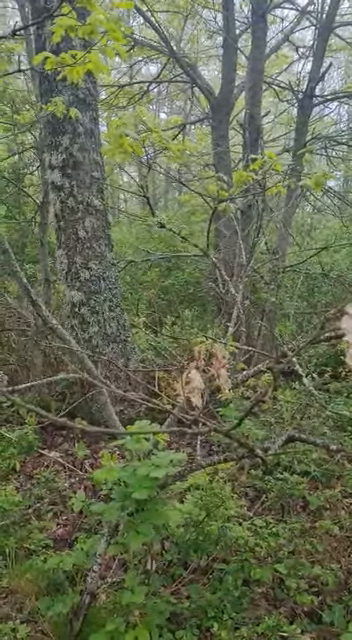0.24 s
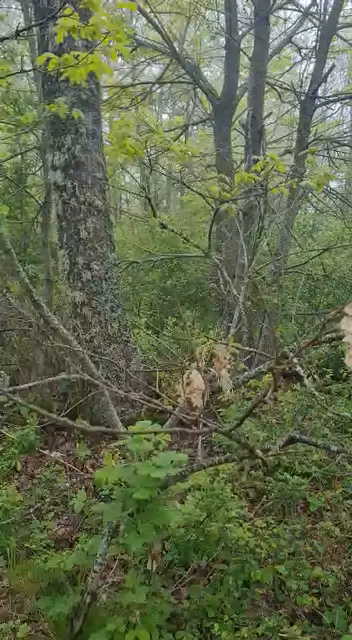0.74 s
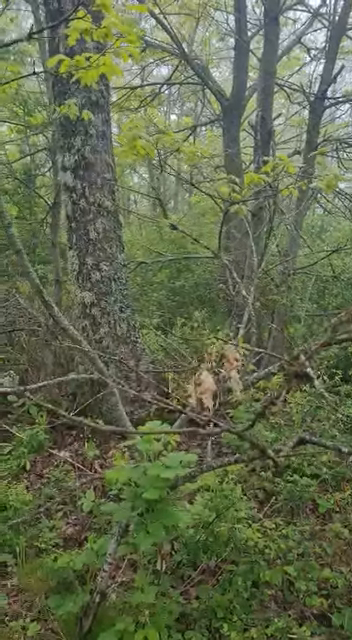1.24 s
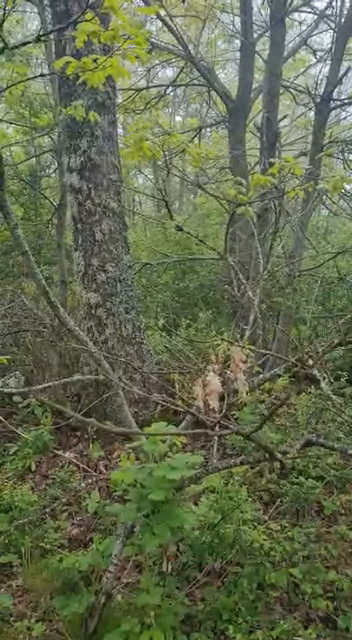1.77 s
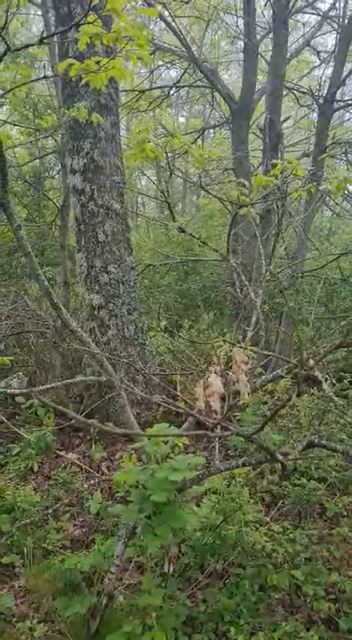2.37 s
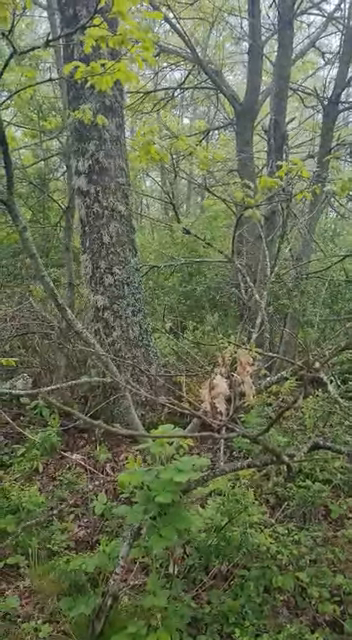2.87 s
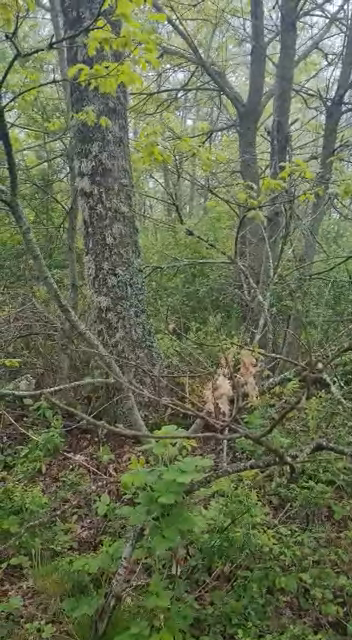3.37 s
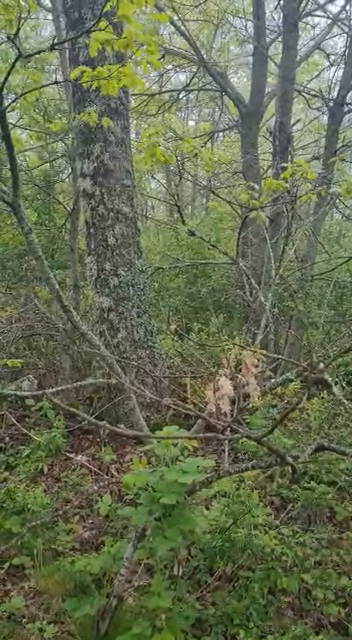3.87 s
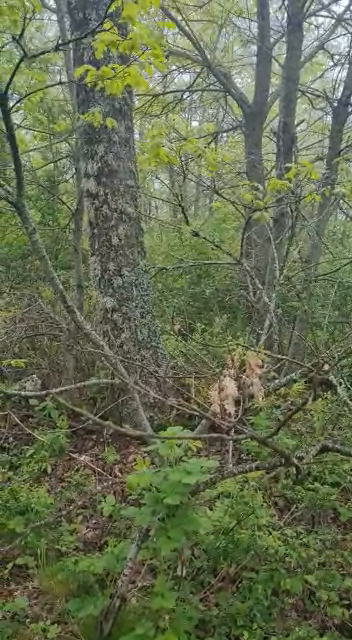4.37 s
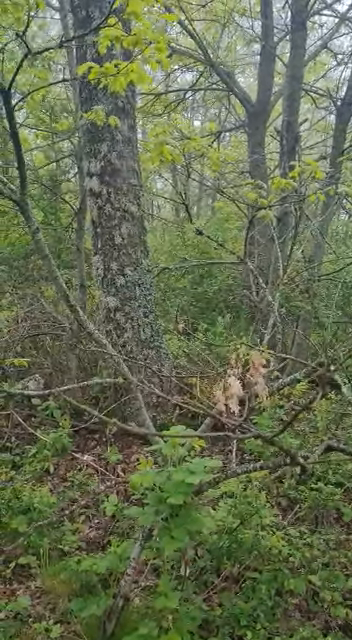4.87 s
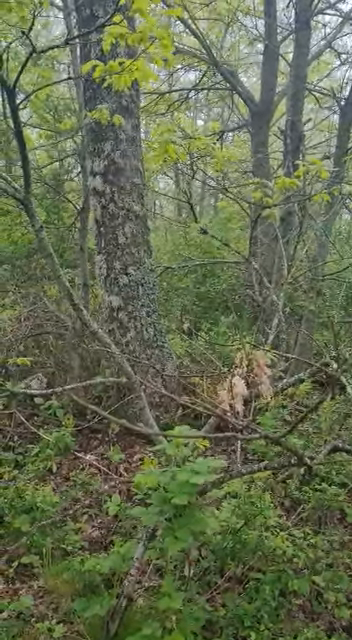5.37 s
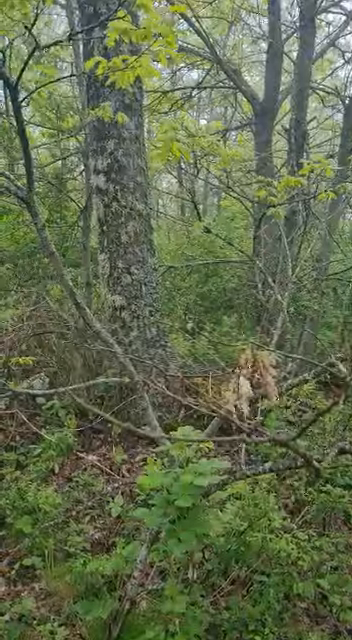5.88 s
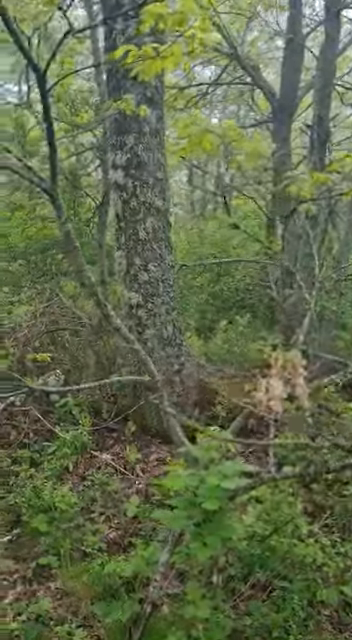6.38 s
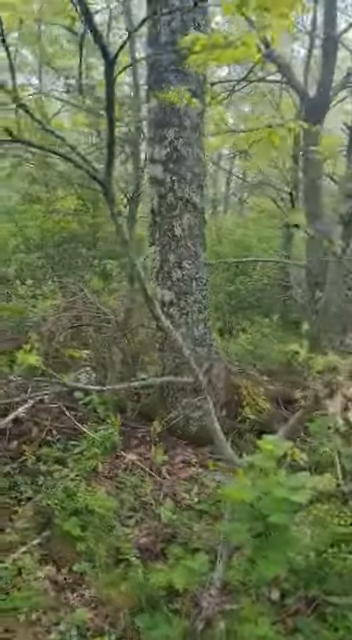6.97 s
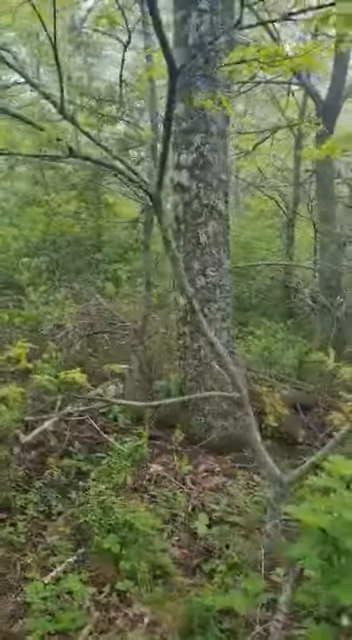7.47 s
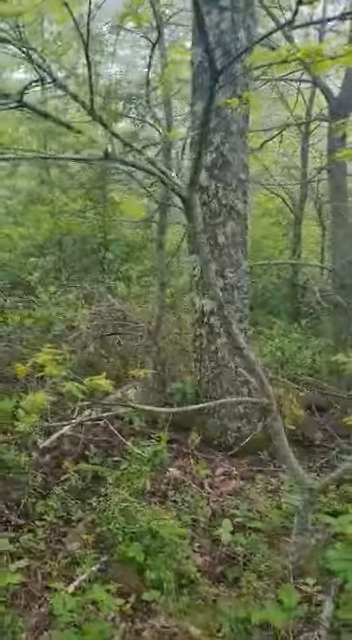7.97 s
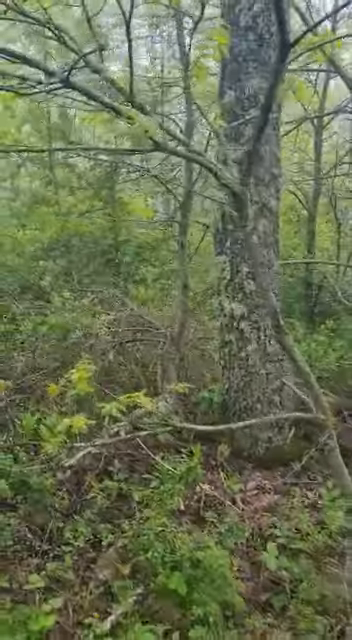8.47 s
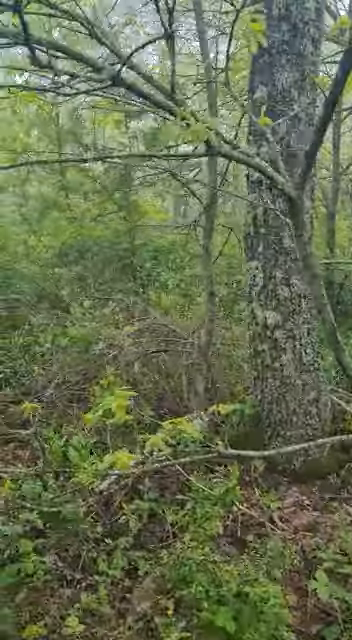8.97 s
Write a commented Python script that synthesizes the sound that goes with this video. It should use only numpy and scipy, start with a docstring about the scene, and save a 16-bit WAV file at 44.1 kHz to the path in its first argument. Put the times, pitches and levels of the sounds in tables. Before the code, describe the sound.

Distant dog barks echo among trees, with a small nearer bell jingling, birds chipping and trilling, and heavy low wind buffeting late on.

```python
"""A hound barks in two runs some way off in a damp wood: a fold tone and a hoarse rasp through its throat,
followed by a diffuse tail of noise scattered from the trunks. A small collar bell jingles nearer by as
scraped ringing modes. Songbirds chip, trill and whistle in gliding sines, with one short buzz.
Gusts of wind thump on the microphone ports as lumpy low noise, over a growing high hiss and still air."""
import sys
import numpy as np
from scipy import signal
from scipy.fft import rfft, irfft, next_fast_len
from scipy.io import wavfile
from scipy.ndimage import uniform_filter1d

SR = 44100
rng = np.random.default_rng(int(sys.argv[2]) if len(sys.argv) > 2 else 0)


def log_audio(samples):
    """Write samples as a 16-bit WAV file to the path given in sys.argv[1]."""
    # one column per channel
    frames = np.atleast_2d(samples).T
    # limit to full scale, then quantise
    limited = np.clip(frames, -1, 1)
    pcm = np.round(limited * 32767).astype(np.int16)
    wavfile.write(sys.argv[1], SR, pcm)


def ratio(d):
    """dB to gain"""
    e = np.asarray(d, float) / 20
    return 10 ** e


N = 407474
TIME = np.arange(N) / SR


def rms_one(x):
    """Scale to unit rms."""
    return x / np.sqrt(np.mean(x ** 2) + 1e-20)


def in_time(rows, t=TIME):
    """Columns of a curve, joined by straight lines."""
    s, *columns = np.transpose(rows)
    return [np.interp(t, s, column) for column in columns]


def at_hz(points, hz):
    """A table read on a log-frequency axis."""
    table_hz, values = np.array(points).T
    return np.interp(np.log(hz + 1), np.log(table_hz), values)


def filtered(x, order, edges_hz, kind):
    """Butterworth filter."""
    return signal.sosfilt(signal.butter(order, edges_hz, kind, fs=SR, output="sos"), x)


def coloured(spectrum):
    """Two unrelated noises with the given spectrum, at unit rms."""
    size = next_fast_len(N)
    white = rfft(rng.standard_normal((2, size)))
    gain = ratio(at_hz(spectrum, np.fft.rfftfreq(size, 1 / SR)))
    return rms_one(irfft(white * gain, size)[:, :N])


def drift(rate_hz):
    """Slow chance for two channels, spread 1."""
    r = np.exp(-2 * np.pi * rate_hz / SR)
    slow = signal.lfilter([1], [1, -2 * r, r * r], rng.standard_normal((2, N + SR)))
    return rms_one(slow[:, SR:])


def resonance(x, hz, width_hz):
    """Two-pole band-pass, gain 1 on top."""
    r = np.exp(-np.pi * width_hz / SR)
    feedback = [1, -2 * r * np.cos(2 * np.pi * hz / SR), r * r]
    return signal.lfilter((1 - r * r) / 2 * np.array([1, 0, -1]), feedback, x)


def fades(t, start, end, fade_s):
    """Soft edges for a note; the closing fade begins at its end."""
    return np.clip((t - start) / fade_s, 0, 1) * np.clip((end - t) / fade_s + 1, 0, 1)


def panned(x, left_db):
    """Place a sound by its left-right level difference."""
    return x * ratio(np.array([[.5], [-.5]]) * left_db)


OCTAVE_DB, OCTAVE_DB_PER_SAG = -10, 25      # the octave is stronger while the pitch climbs
BELOW_DB, ABOVE_DB = -19, -14      # lines that the pattern adds below and above the tone


def fold_tone(cycles, group, sag, climbing, luck):
    """The clear tone of the vocal folds, with lines in between where strong and weak cycles alternate."""
    slow = 2 * np.pi * cycles / group
    octave = ratio(OCTAVE_DB + OCTAVE_DB_PER_SAG * sag * climbing) * np.sin(2 * group * slow)
    tone = np.sin(group * slow) + ratio(ABOVE_DB) * np.sin((group + 1) * slow) + octave
    unsteady = ratio(4 * np.interp(cycles / 6, np.arange(128), luck))      # the pattern comes and goes
    below = sum(ratio(BELOW_DB - 8.4 * k) * np.sin((group - 1 - k) * slow) for k in range(group - 1))
    return tone + unsteady * below


JITTER, RASP = 0.045, 0.89      # pulse timing spread [cycles], noise against unit-rms pulses
# throat resonances: (centre [Hz], width [Hz], level [dB])
THROAT = [(553.6, 77, 9), (952, 148, 11), (1397, 86, 6), (1620, 334, -2.5), (2495, 250, -7),
          (3900, 700, -38.5)]


def hoarse_throat(cycles, group, rasp, throat_share, luck):
    """Uneven pulses from the folds and rasping noise ring the resonances of the throat."""
    uneven = cycles + JITTER * np.interp(cycles, np.arange(128), luck[0])
    strength = ratio(3.5 * luck[1][uneven.astype(int) % 128])
    pulses = np.diff(np.floor(uneven), prepend=0).clip(0) * strength
    pattern = 1 + 0.24 * np.cos(2 * np.pi * cycles / group)
    source = (rms_one(pulses) + RASP * rasp) * pattern
    throat = 0
    for k, (centre_hz, width_hz, db) in enumerate(THROAT):
        throat = throat + ratio(db) * resonance(source, centre_hz * throat_share, width_hz) * (-1) ** k
    return rms_one(filtered(throat, 4, [480, 3000], "band"))


BREATH_DB = -15
AIR_AWAY_DB, AIR_FACING_DB = -26.5, -8.5      # highest hiss against the lower hiss
TURN_S = 5      # from here on the muzzle points this way


def breath(rasp, start):
    """The rasp heard as hiss above the throat, brightest when the muzzle points this way."""
    air_db = AIR_FACING_DB if start > TURN_S else AIR_AWAY_DB
    low_hiss = filtered(rasp, 2, [3000, 7600], "band")
    high_hiss = filtered(rasp, 2, [8000, 15400], "band")
    return ratio(BREATH_DB) * (low_hiss + ratio(air_db) * high_hiss)


CREST_SHARE = .52      # place of the top of the pitch arch in the bark
START_SAG, END_SAG = .42, .44      # share of the top pitch missing at either end
FALL_POWER = 1.5      # the pitch leaves the top more steadily than it came
WOBBLE = .035      # unsteady pitch of the folds, as a share
TONE_DB_PER_SAG = 54.5      # the clear tone fades as the pitch leaves the top
HOARSE_ATTACK_S, HOARSE_START_DB, HOARSE_OPEN_DB, HOARSE_END_DB = 0.047, -34, -0.5, -17.5
HIGH_BARK_HZ = 585      # lower barks repeat a strong-weak pattern every three cycles, higher ones every four


def bark(start, length, top_hz, tone_db, hoarse_db, throat_share):
    """A clear fold tone on an arch of pitch; its uneven pulses and rasp ring the throat."""
    end, crest = start + length, start + CREST_SHARE * length
    t = np.arange(start, end + 0.0067, 1 / SR)
    climbing = t < crest
    rise_sag = START_SAG * ((crest - t) / (crest - start)) ** 2
    fall_sag = END_SAG * (abs(t - crest) / (end - crest)) ** FALL_POWER
    sag = np.where(climbing, rise_sag, fall_sag)
    tone_db = tone_db - TONE_DB_PER_SAG * sag
    hoarse_db = hoarse_db + np.interp(t, [start, start + HOARSE_ATTACK_S, crest, end],
                                      [HOARSE_START_DB, HOARSE_OPEN_DB, 0, HOARSE_END_DB])
    luck = rng.standard_normal((2, 128))
    wobble = np.interp(t, np.linspace(start, end, 9), rng.standard_normal(9))
    cycles = np.cumsum(top_hz * (1 - sag) * (1 + WOBBLE * wobble)) / SR
    group = 4 if top_hz > HIGH_BARK_HZ else 3
    rasp = rng.standard_normal(len(t))
    tone = fold_tone(cycles, group, sag, climbing, luck[1])
    hoarse = hoarse_throat(cycles, group, rasp, throat_share, luck) + breath(rasp, start)
    voice = np.sqrt(2) * ratio(tone_db) * tone + ratio(hoarse_db) * hoarse
    return round(start * SR), voice * fades(t, start, end, 0.024)


# barks: (start [s], length [s], top pitch before wobble [Hz], clear tone at the crest [dB],
#         hoarse part at the crest [dB], throat pitch [share of normal])
BARKS = [(0.779, 0.17, 537.8, -49.5, -36.5, 1.066), (1.237, 0.17, 504.5, -49.5, -38, 1.015),
         (1.789, 0.18, 512.4, -48.5, -39.5, 1.04), (2.275, 0.19, 567, -46, -37, 1.044),
         (2.758, 0.18, 511.5, -47, -38, 1.057), (6.418, 0.17, 595.6, -38, -34, 1.085),
         (6.816, .185, 679, -33, -35, 1.08), (7.194, .165, 625.7, -34, -37.5, 1.002),
         (7.66, .17, 561, -42, -39.5, 1.057), (8.101, 0.19, 574.2, -47, -39, 1.27),
         (8.805, 0.17, 553.4, -46.5, -39.5, 1.074)]


def hound():
    """Two runs of barks from one dog, each bark added at its start."""
    out = np.zeros(N)
    for row in BARKS:
        at, sound = bark(*row)
        out[at:at + len(sound)] += sound
    return out


# decay of the wood's tail: (frequency [Hz], time to fall 60 dB [s])
WOOD_T60_S = [(300, 0.7), (1000, 0.84), (2500, 0.72), (6000, 0.33), (14000, 1)]


def wood(x, onset_s):
    """Scatter from many trunks: noise that swells briefly and dies band by band, partly shared by both ears."""
    t, tail = np.arange(SR) / SR, 0
    edges = 150 * 2 ** np.arange(0, 7.1, .5)
    for low, high in zip(edges, edges[1:]):
        band = filtered(rng.standard_normal((2, SR)), 2, [low, high], "band")
        tail = tail + band * ratio(-60 * t / at_hz(WOOD_T60_S, np.sqrt(low * high)))
    tail = tail * (1 - np.exp(-t / onset_s)) / np.sqrt(SR / 20)
    tail = tail + 0.79 * tail.mean(axis=0)      # part of the scatter comes from straight ahead
    return signal.fftconvolve(x[None], tail)[:, :N]


BELL_LEFT_DB, BELL_SWING_DB = -3, 1.5      # where the bell hangs, and how far each stroke strays from there
# faint chance touches between the strokes
TOUCH_FROM_S, TOUCH_DB, TOUCH_SPREAD_DB, TOUCH_LOW_DB = 3., -72., 2, -8.5
# the clearest bell strokes: (time [s], relative level [dB], relative weight of the low modes [dB])
JINGLE = [(0.0794, -81.5, 8), (0.265, -65, -0.5), (0.3037, -64, -4), (0.4334, -67, -0.5),
          (1.0859, -63.5, -15), (2.0712, -71, -5.5), (2.561, -55, -7.5), (3.0946, -57.5, -5.5),
          (3.3406, -66, 0), (3.4199, -75, 2), (3.504, -72.5, 6), (3.6199, -69.5, -4),
          (3.8833, -60.5, -13.5), (3.991, -58, -11.5), (4.1061, -57, -34.5), (4.184, -60.5, -6),
          (4.484, -57, -5), (4.5326, -58, -11.5), (4.6852, -56.5, -1.5), (4.795, -55, 2),
          (5.0095, -56.5, -1), (5.0524, -61, -27), (5.1816, -48.5, -31.5), (5.455, -60, -27.5),
          (5.5203, -56.5, -24), (5.7314, -60, -6.5), (5.8047, -47, -24.5), (6.0107, -49.5, -2.5),
          (6.1145, -45, -11), (6.4378, -52, -5), (6.4697, -41, -14), (6.667, -57.5, -11), (6.81, -46, -8),
          (6.8389, -52.5, -9.5), (7.0219, -58.5, -1.5), (7.234, -58, -17), (7.3707, -59.5, 3.5),
          (7.703, -51, -17), (7.8416, -67, 4), (8.254, -57.5, -19), (8.4722, -57, 1), (8.6524, -58.5, -6),
          (8.774, -59, -29.5), (9.0215, -62.5, 3.5), (9.0658, -69, -3)]


def strokes(count=26):
    """Clear clapper strokes and faint chance touches: time, level, low-mode weight, left-right difference."""
    when, size = rng.random(count), rng.standard_normal(count)
    touch_s = TOUCH_FROM_S + when * (N / SR - TOUCH_FROM_S)
    touches = [touch_s, TOUCH_DB + TOUCH_SPREAD_DB * size, np.full(count, TOUCH_LOW_DB)]
    s, level_db, low_db = np.hstack([np.transpose(JINGLE), touches])
    return s, level_db, low_db, BELL_LEFT_DB + BELL_SWING_DB * rng.standard_normal(len(s))


# bell modes: (frequency [Hz], relative level [dB], time to fall 60 dB [s])
BELL = [(2124, -14, .12), (2229, 0, .18), (4701, -11, .2), (5349, -10, .18), (6562, -19, .15),
        (7284, -16, .15), (8748, -10, .16), (9302, -13, .15), (11177, -12, .14), (11256, -12, .14),
        (12300, -20, .12), (13600, -13, .1), (13947, -10, .1), (14038, -7, .11), (14088, -6, .12),
        (14202, -6, .11), (14330, -8, .1), (15500, -14, .1)]


def bell():
    """Each stroke scrapes every mode with a strength of its own, then rattles lightly as the modes ring down."""
    s, level_db, low_db, left_db = strokes()
    at, out = (s * SR).astype(int), np.zeros((2, N))
    luck = rng.standard_normal((len(at), len(BELL)))
    scrape, rattle, swell = (np.exp(-1 / (decay_s * SR)) for decay_s in (0.014, .07, .0025))
    for k, (hz, db, t60) in enumerate(BELL):
        low_lift_db = np.minimum(low_db + 6.5, 14) * (hz < 3000)
        blow_db = level_db - 31.5 + db + 2.5 * luck[:, k] + low_lift_db
        blows = np.zeros((2, N))
        blows[:, at] = panned(ratio(blow_db), left_db)
        scraping = signal.lfilter([1], [1, -scrape], blows + 1e-18)
        rattling = ratio(-11.5) * signal.lfilter([1], [1, -rattle], blows + 1e-18)
        # the contact builds up softly
        force = signal.lfilter([1 - swell], [1, -swell], scraping + rattling)
        force = force * (rng.standard_normal(N) + 1.265 * rng.standard_normal((2, N)))
        force[0] = np.roll(force[0], rng.integers(0, 8))      # each mode has its own delay at the left port
        r, w = ratio(-60 / (t60 * SR)), 2 * np.pi * hz / SR
        out += signal.lfilter([0, np.sin(w)], [1, -2 * r * np.cos(w), r * r], force + 1e-18)
    return filtered(out, 4, 1950, "high")      # too small to radiate lower


def sing(out, start, hz, gain):
    """A near sine added at its place."""
    at = round(start * SR)
    note = gain * np.sin(2 * np.pi * np.cumsum(hz) / SR)
    return out + np.pad(note, (at, N))[:N]


CHIP_TOP_HZ, DOUBLE_TOP_HZ, DOUBLE_END_HZ = 7000, 4400, 2793
SECOND_S, SECOND_DB = .02, -4      # the second chip of a pair: how much later, how much weaker
# falling chips: (time, 8 ms after onset [s], relative level [dB], pitch it settles on [Hz])
CHIPS = [(0.517, -65.5, 3900), (1.55, -69.5, 3800), (1.904, -59.5, 4680), (2.269, -65.5, 4900),
         (2.631, -67, 3970), (2.984, -70, 3760), (3.373, -62, 4650), (3.752, -68, 3585), (4.114, -65, 3466),
         (4.478, -59, 4160), (7.216, -60, 3450), (8.583, -70, 3860), (8.688, -80, 4770),
         (8.943, -62.5, 3920)]
# double chips of a lower bird: (time of the first, 8 ms after onset [s], relative level [dB])
DOUBLES = [(5.25, -63), (5.342, -60.5), (5.442, -60.5), (5.548, -60)]


def chips():
    """A fast fall from high up that levels out on a short whistle."""
    out, t = np.zeros(N), np.arange(0, .075, 1 / SR)
    notes = [(s, db, CHIP_TOP_HZ, end_hz) for s, db, end_hz in CHIPS]
    for s, db in DOUBLES:
        notes += [(s + k * SECOND_S, db + k * SECOND_DB, DOUBLE_TOP_HZ, DOUBLE_END_HZ) for k in (0, 1)]
    for s, level_db, top_hz, end_hz in notes:
        fall_hz = top_hz - end_hz
        hz = end_hz + fall_hz * np.exp(-t / 0.01)
        shape = fades(t, 0, fall_hz / 75000, 0.0016)      # a deeper fall lasts longer
        out = sing(out, s - .008, hz, ratio(level_db - 2.0) * shape)
    return out


FIRST_GAP_S, SLOWING = .042, 1.052      # each gap is longer than the one before by this factor
# slowing trills: (start [s], notes [count], relative level of the first note [dB], of the last [dB])
TRILL = [(0.405, 16, -67, -61.5), (4.405, 15, -71, -61.5)]


def trill():
    """Each note sweeps upward on two husky voices; later, longer notes are louder and reach higher."""
    out, t = np.zeros(N), np.arange(0, .09, 1 / SR)
    for start, notes, first_db, last_db in TRILL:
        gaps = FIRST_GAP_S * SLOWING ** np.arange(round(notes))
        onsets = start + np.cumsum(gaps) - gaps
        for s, gap, level_db in zip(onsets, gaps, np.linspace(first_db, last_db, len(gaps))):
            husk = 1 + .04 * rms_one(uniform_filter1d(rng.standard_normal(len(t)), size=60))
            burr = 1 + 0.22 * np.sin(2 * np.pi * 140 * t)
            shape = ratio(level_db) * fades(t, 0, 0.5 * gap, 0.021) * burr
            out = sing(out, s, (6300 + 30000 * t) * husk ** 3, shape * ratio(-11.0))      # faint breathy overtone
            out = sing(out, s, (3250 + 19000 * t) * husk, shape)
            out = sing(out, s + .005, (4150 + 19000 * t) * husk, shape * ratio(-1.0))
    return out


GLIDE_SHARE, NOTE_FADE_DB = 0.42, -17.5      # the glide is over within this share of a note, which then dies away
# whistled notes: (start [s], length [s], first pitch [Hz], last pitch [Hz], relative level [dB])
WHISTLES = [(5.154, 0.076, 3900, 3344, -62.5), (5.636, 0.049, 5230, 4740, -70.5),
            (5.655, 0.27, 3680, 3730, -75), (5.684, .08, 4740, 5700, -65.5), (5.797, 0.11, 4350, 3780, -68),
            (5.969, 0.072, 2910, 2845, -74), (6.135, 0.12, 3150, 2980, -73),
            (6.245, 0.057, 3930, 3470, -63), (6.283, 0.098, 3120, 2800, -61.5),
            (6.54, 0.12, 4170, 3670, -67.5), (6.588, 0.05, 3080, 2890, -71), (6.701, 0.1, 3539, 3530, -63),
            (6.728, 0.1, 2830, 3140, -61.5), (7.008, 0.032, 4040, 4210, -64),
            (7.047, 0.12, 3830, 3400, -59), (7.076, .065, 4590, 4250, -60),
            (7.149, 0.083, 4050, 4280, -59.5), (7.288, 0.033, 3060, 3110, -59),
            (7.296, 0.058, 3420, 3700, -62), (7.468, 0.11, 3974, 4006, -70),
            (7.646, 0.065, 4000, 3450, -72), (7.677, 0.15, 3417, 3394, -66), (8.012, .1, 2780, 3130, -70),
            (8.157, 0.054, 3740, 3300, -58), (8.354, .1, 3755, 3433, -64), (8.605, .05, 3080, 2704, -70)]


def whistles():
    """Quavering near sines that glide to their pitch and die away."""
    out = np.zeros(N)
    for start, length, first_hz, last_hz, level_db in WHISTLES:
        t = np.arange(0, length + 0.0063, 1 / SR)
        hz = np.interp(t, [0, GLIDE_SHARE * length], [first_hz, last_hz])
        level_db = level_db + np.interp(t, [GLIDE_SHARE * length, length], [0, NOTE_FADE_DB])
        quaver = 1 + 0.018 * np.sin(2 * np.pi * rng.uniform(44.4, 90) * t)
        out = sing(out, start, hz * quaver, np.sqrt(2) * ratio(level_db) * fades(t, 0, length, 0.0011))
    return out


BUZZ_S, BUZZ_RISE_S, BUZZ_FALL_S = 6.014, 0.088, 0.11      # time of the peak, and the slopes around it
BUZZ_DB, BUZZ_RISE_DB, BUZZ_FALL_DB = -53, -37, -30.5      # relative peak level, and each end against it
BUZZ_HZ, BUZZ_SAG_HZ_PER_S = 7480, 610


def buzz():
    """One sagging high note whose fast, partly random flutter of pitch spreads it into a band."""
    start, end = BUZZ_S - BUZZ_RISE_S, BUZZ_S + BUZZ_FALL_S
    hz = BUZZ_HZ - BUZZ_SAG_HZ_PER_S * (TIME.clip(start, end) - BUZZ_S)
    level_db = BUZZ_DB + np.interp(TIME, [start, BUZZ_S, end], [BUZZ_RISE_DB, 0, BUZZ_FALL_DB])
    flutter = 1 + 0.056 * np.sin(2 * np.pi * 130 * TIME) + 0.034 * drift(300)[0]
    shape = np.sqrt(2) * ratio(level_db) * fades(TIME, start, end, 0.0085)
    return shape * np.sin(2 * np.pi * np.cumsum(hz * flutter) / SR)


# wind on the ports: (time [s], relative level [dB], left-right difference [dB])
GUSTS = [(0.0, -76.5, -2), (4.4, -77.5, -4.5), (4.89, -74.5, 5.0), (4.92, -46.5, 38), (4.99, -47, -15),
         (5.04, -47, -43), (5.12, -45.5, -1), (5.22, -62, -24.5), (5.27, -42.5, -34), (5.33, -63.5, -19),
         (5.4, -52, 26), (5.48, -83, 3.5), (5.56, -58.5, -14), (5.74, -80.5, -5), (6.97, -69, -3),
         (7.05, -59, 23), (7.1, -66.5, -14), (7.38, -54.5, -8), (7.59, -75, -3.0), (7.8, -68.5, 1.5),
         (7.98, -77, -8.0), (8.11, -41.5, 8), (8.16, -42, -17), (8.23, -32.5, -8), (8.34, -27, -16.5),
         (8.39, -35, -7), (8.49, -28.5, -12), (8.54, -26.5, -14), (8.59, -24.5, -17), (8.62, -40.5, -3),
         (8.64, -29, 0.5), (8.67, -45, 4), (8.7, -39.5, 20), (8.75, -42.5, 49), (8.83, -46.5, 19),
         (8.98, -40.5, -3), (9.06, -46, 14.5), (9.14, -36.5, 1.0), (9.19, -52.5, 27), (9.24, -50, 30)]
# spectrum in a strong gust: (frequency [Hz], relative density [dB per Hz])
WIND = [(12, -52), (20, -9.5), (59, 5), (120, -4.5), (275, -8), (439, -23), (619, -31.5), (1010, -46),
        (1500, -59), (1950, -72), (3300, -120)]


def wind():
    """Lumpy turbulence of its own at each port; the upper part grows faster than the bass as the gust rises."""
    level_db, left_db = in_time(GUSTS)
    level_db = level_db + 2.8 * drift(9.4)      # each port swells and sinks by itself
    noise = coloured(WIND)
    low = filtered(noise, 4, 115, "low")
    upper_db = 1.37 * np.minimum(level_db + 29.0, 0) + 2.93 * drift(30)
    upper = (noise - low) / np.std(low) * ratio(upper_db)
    low = low / np.sqrt(uniform_filter1d(low ** 2, size=2500) + 1e-9)      # the gust, not chance, sets the level
    sides = 2 / np.sqrt(1 + ratio(2 * left_db * np.array([[-1], [1]])))
    return filtered(ratio(level_db) * sides * (low + upper), 3, 42, "high")


HISS_DRIFT_DB = 2
# high background hiss: (time [s], level before the drift [dB])
HISS = [(0.0, -84.5), (3.5, -80), (6, -75), (9.24, -72)]


def high_hiss():
    """Broad high background hiss, growing over time, its level drifting slowly."""
    hiss = coloured([(1500, -22.0), (2500, 1.0), (6000, 4.0), (16000, -5.5)])      # (Hz, dB)
    return ratio(in_time(HISS)[0] + HISS_DRIFT_DB * drift(6)) * hiss


STILL_AIR_DB = -77.5      # middle of a slow drift
# spectrum of the still air: (frequency [Hz], relative density [dB per Hz])
STILL_AIR = [(71, -29.5), (120, -2), (199, -11.5), (264, -8), (403, -13.5), (1560, -29.5), (1760, -31.5),
             (2000, -20.5), (2600, -40), (4400, -120)]


def still_air():
    """Faint low noise whose level drifts separately on each side."""
    return ratio(STILL_AIR_DB + 4.5 * drift(6.2)) * coloured(STILL_AIR)


DOG_LEFT_DB, BIRDS_LEFT_DB = -1, -0.56


def scene():
    """Dog and birds with the wood's tail, bell, wind, high hiss and still air."""
    dog, ring = hound(), bell()
    birds = chips() + trill() + whistles() + buzz()
    far_dog = panned(dog, DOG_LEFT_DB) + ratio(-11.5) * wood(dog, 0.0037)
    far_birds = panned(birds, BIRDS_LEFT_DB) * ratio(4.0) + wood(birds, 0.006)
    far = far_dog + far_birds
    far[0] = np.roll(far[0], -3)      # the left port is a little nearer
    near = ring + ratio(-14.0) * wood(ring.mean(axis=0), 0.015)
    return far + near + wind() + high_hiss() + still_air()


def low_pass(x):
    """Removes everything above the highest recorded frequency."""
    return signal.sosfilt(signal.butter(12, 16470, fs=SR, output="sos"), x)


def record(dry):
    """A small stereo recorder that rounds off the strongest gusts."""
    mix = 0.74 * np.tanh(dry / 0.66)
    return low_pass(mix)


dry = scene()
out = record(dry)
log_audio(out)
```